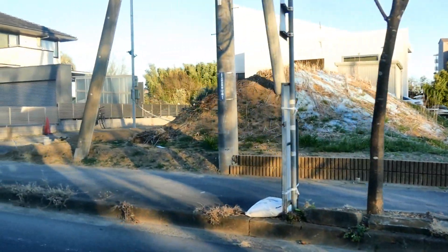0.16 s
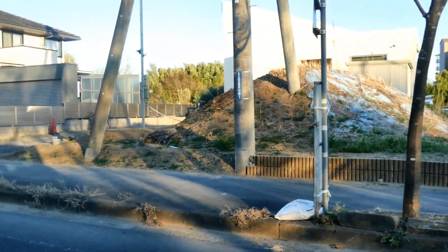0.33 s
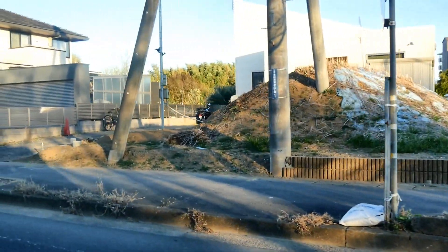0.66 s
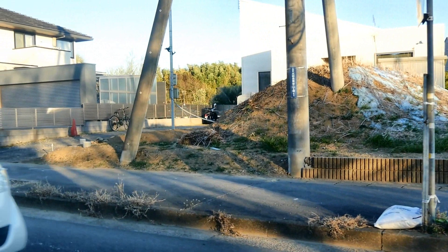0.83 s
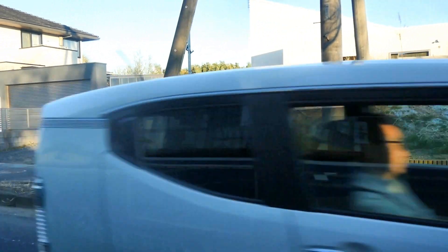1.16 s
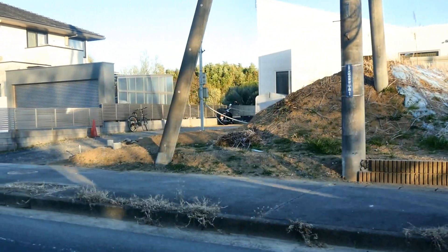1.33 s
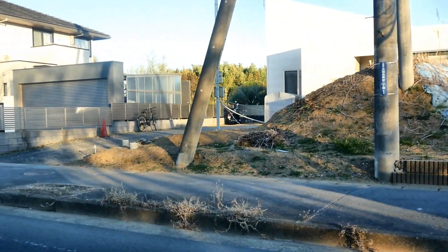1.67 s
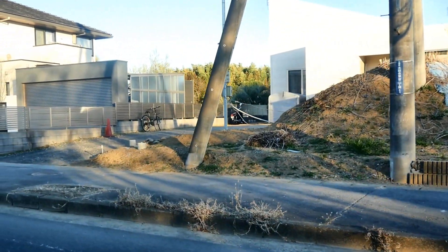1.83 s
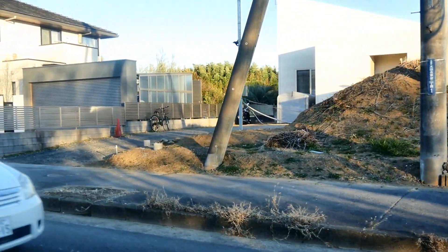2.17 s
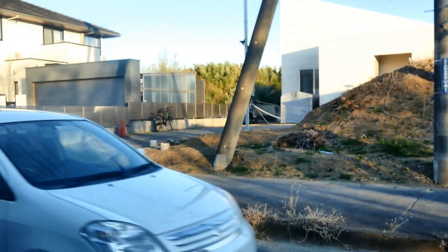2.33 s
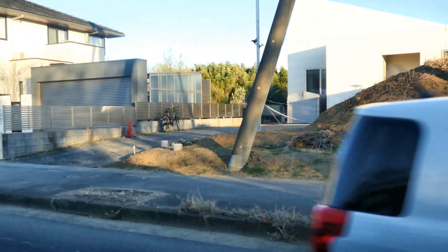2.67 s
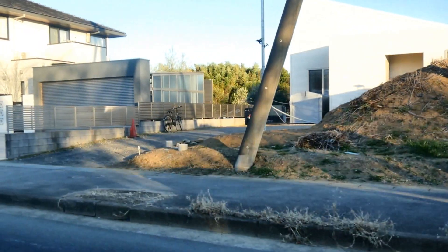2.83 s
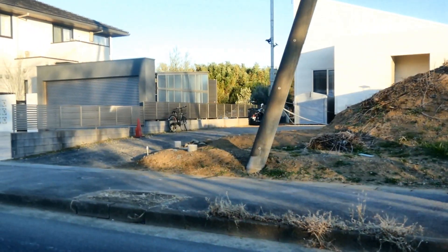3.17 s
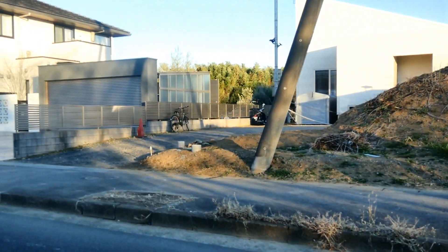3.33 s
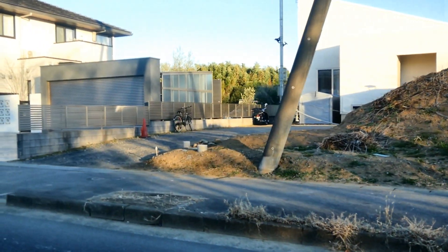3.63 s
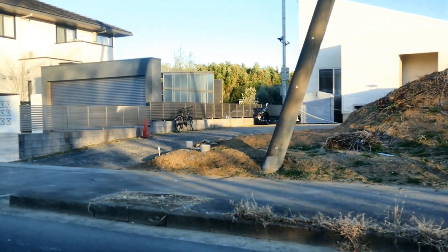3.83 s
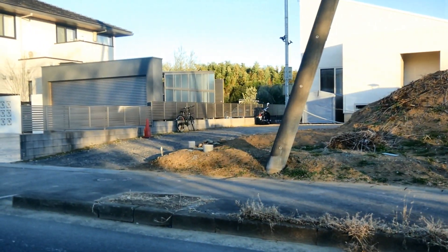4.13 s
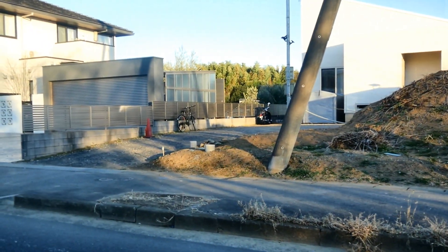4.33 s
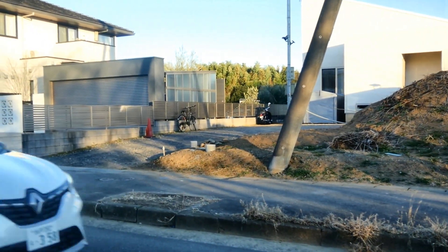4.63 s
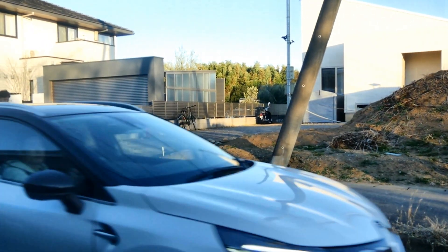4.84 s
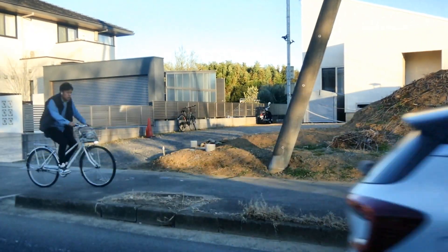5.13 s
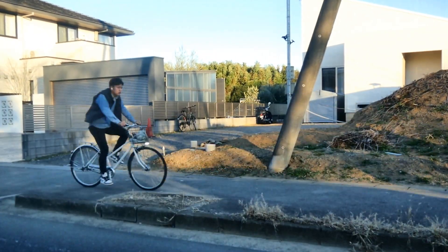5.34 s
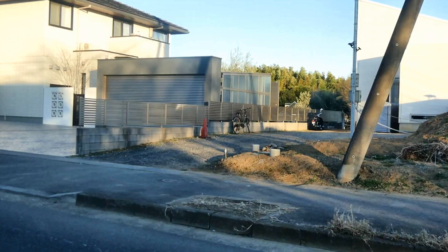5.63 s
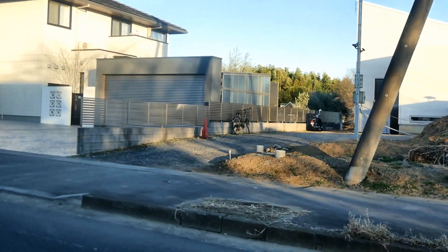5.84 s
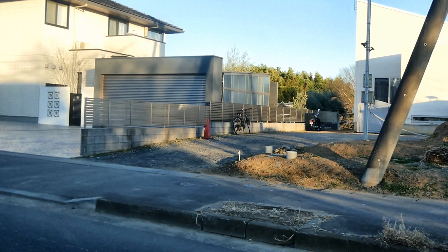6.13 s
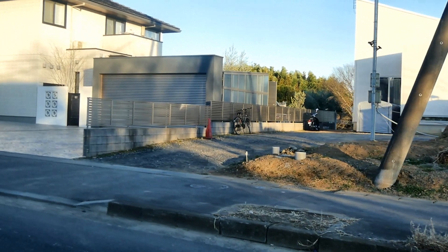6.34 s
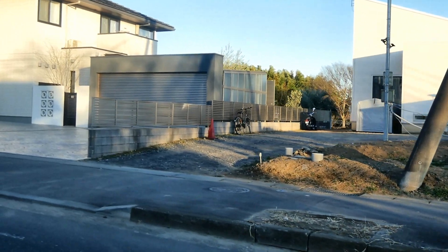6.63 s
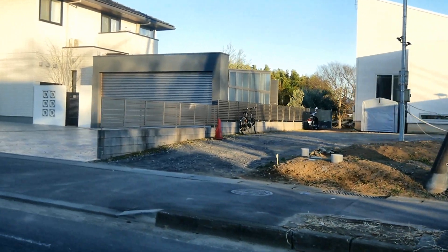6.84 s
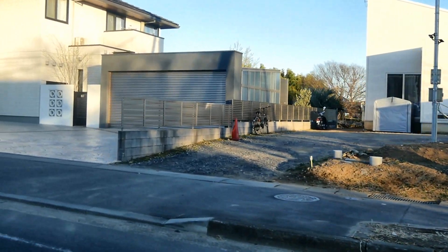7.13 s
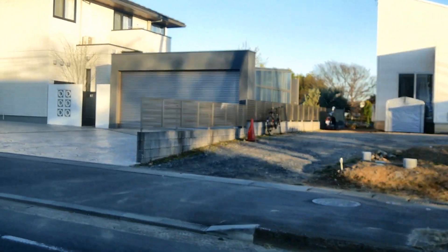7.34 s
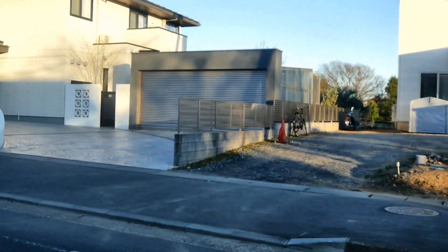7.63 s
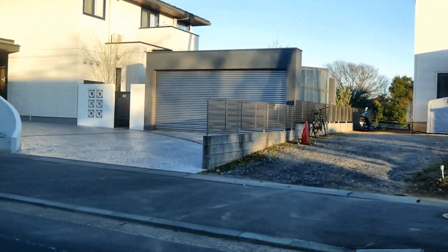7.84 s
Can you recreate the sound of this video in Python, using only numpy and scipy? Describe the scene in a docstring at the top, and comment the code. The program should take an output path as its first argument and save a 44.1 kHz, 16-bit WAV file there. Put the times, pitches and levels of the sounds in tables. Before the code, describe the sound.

Inside a mid-size bus, low road rumble and a steady fan hum lie under close rustles of a nylon jacket. Brakes squeal thinly and groan, oncoming cars swish faintly beyond the glass, and a wheel thumps softly over a bump. After a quarter second of complete silence, the bus pulls away: the body drones and shudders, the diesel climbs, gears whine and a small metal fitting ticks.

```python
"""Inside a mid-size bus. Filtered noise makes the road rumble, passing cars and a rustling nylon jacket; sines make
the fan hum, the groaning brakes and their gliding squeals; struck modes make a wheel bump.
After a short silent break the bus pulls away: the clutch shudders a droning body, the diesel climbs as firing
orders over pulsing noise, drive-line tones flare through cabin resonances and a small metal fitting ticks."""
import sys
import numpy as np
from scipy import signal
from scipy.fft import rfft, irfft, next_fast_len
from scipy.io import wavfile
from scipy.ndimage import uniform_filter1d

SR = 44100
rng = np.random.default_rng(int(sys.argv[2]) if len(sys.argv) > 2 else 0)


def generate_wav(signal):
    """Clip the signal to [-1, 1] and save it as 16-bit WAV at the path in sys.argv[1]."""
    frames = np.transpose(np.atleast_2d(signal))
    scaled = np.clip(frames, -1, 1) * 32767
    pcm = np.round(scaled).astype(np.int16)
    wavfile.write(sys.argv[1], SR, pcm)


N = 352359
T = np.arange(N) / SR   # time [s]

# silent break: (start [s], end [s])
BREAK_S = (5.738, 5.983)
# colour of sliding nylon: (frequency [Hz], relative level per Hz [dB])
NYLON = [(200, -29), (900, -18.5), (2000, -4), (4000, -3.5), (7000, -4), (10300, -1), (12500, -4.5),
         (15000, -13.5)]
# jolts as the clutch takes up: (time [s], relative strength [dB])
SHUDDERS = [(6.098, -21), (6.142, -19), (6.212, -37), (6.394, -13.5), (6.497, -13), (6.55, -21),
            (6.64, -14.5), (6.735, -19), (6.777, -12), (6.821, -18.5), (6.86, -13), (6.909, -12.5),
            (6.934, -15), (6.971, -11.5), (7.04, -24.5), (7.079, -10.5), (7.11, -9.5), (7.18, -15)]
IDLE_HZ, THROTTLE_S = 47.5, 6.65   # firing rate at idle, and when the throttle opens


def from_db(db):
    """Decibels to gain."""
    return 10 ** (np.asarray(db) / 20)


def rms_one(x):
    """Scale to unit power."""
    return x / np.sqrt(np.mean(x ** 2) + 1e-20)


def in_time(rows):
    """Each column of a breakpoint curve at every sample."""
    s, *columns = np.transpose(rows)
    return [np.interp(T, s, column) for column in columns]


def gain_at(points, hz):
    """Gain of a spectrum table, interpolated on a log-frequency axis."""
    at, db = np.transpose(points)
    return from_db(np.interp(np.log(hz + 1), np.log(at), db))


def drift(rate_hz):
    """Random wander of rms 1: noise through a two-pole low-pass, made at every 40th sample."""
    pole = np.exp(-80 * np.pi * rate_hz / SR)
    noise = rng.standard_normal(N // 40 + 2002)
    slow = signal.lfilter([1], [1, -2 * pole, pole * pole], noise)[2000:]   # drop the settling time
    return np.interp(np.arange(N) / 40, np.arange(len(slow)), rms_one(slow))


def held(start, length, attack_s, release_s):
    """Envelope that swells exponentially up to its start, holds at 1, then dies away exponentially."""
    before = (start - T) / attack_s
    after = (T - start - length) / release_s
    return np.exp(-np.maximum(0, np.maximum(before, after)))


def tone(hz):
    """A sine of rms 1 that follows a pitch curve from a random phase."""
    cycles = np.cumsum(hz) / SR + rng.random()
    return np.sqrt(2) * np.sin(2 * np.pi * cycles)


def cabin_noise(spectrum):
    """Coloured stereo noise, mostly alike in the bass and diffuse in the treble; the mid has rms 1."""
    # stereo width: (frequency [Hz], side relative to mid [dB])
    width = [(60, -15), (130, -38.5), (250, -18.5), (400, -17), (700, -5), (1200, -0.5), (2400, -0.5),
             (8000, -1.5), (15000, -3.5)]
    size = next_fast_len(N)
    hz = np.arange(size // 2 + 1) * SR / size
    coloured = rfft(rng.standard_normal((2, size))) * gain_at(spectrum, hz)
    mid = irfft(coloured[0], size)[:N]
    side = irfft(coloured[1] * gain_at(width, hz), size)[:N]
    return np.array([mid + side, mid - side]) / np.std(mid)


def resonate(x, hz, width_hz):
    """Noise through one resonance, at unit power."""
    return rms_one(signal.lfilter(*signal.iirpeak(hz, hz / width_hz, fs=SR), x))


def strike(events, hz, t60):
    """Each (time [s], level [dB]) event sets one mode ringing; it falls 60 dB in t60 seconds."""
    clicks = np.zeros(N) + 1e-18
    for s, db in events:
        clicks[int(s * SR)] = from_db(db)
    pole = from_db(-60 / (t60 * SR))
    angle = 2 * np.pi * hz / SR
    return signal.lfilter([0, np.sin(angle)], [1, -2 * pole * np.cos(angle), pole * pole], clicks)


def echoes(x, count=14, last_s=0.056):
    """Early reflections off windows and seats, different at each ear; their gains keep the power."""
    out = np.zeros((2, N))
    for ear in out:
        delays = rng.uniform(0, last_s, count)
        gains = np.exp(-2 * delays / last_s) * rng.choice([-1, 1], count)
        gains = gains / np.linalg.norm(gains)
        for lag, gain in zip((delays * SR).astype(int), gains):
            ear[lag:] += gain * x[:N - lag]
    return out


def road(level_db=-30, uneven_db=0.8):
    """Tyres rumble through the floor; oncoming cars behind the glass swell and fade with distance."""
    # rolling noise in the cabin: (frequency [Hz], relative level per Hz [dB])
    rolling_colour = [(20, -35.5), (40, -20), (62, -17.5), (85, -4.5), (125, -1), (230, -0.5), (330, -3),
                      (450, -1.5), (505, -7.5), (605, -3), (660, -7), (705, -13), (780, -12.5),
                      (1170, -15.5), (1290, -21.5), (1460, -20), (1650, -22.5), (2300, -27.5), (2800, -25),
                      (3600, -33), (7000, -43.5), (10500, -39.5), (15000, -56)]
    # oncoming cars: (time [s], level [dB], passing time [s])
    cars = [(1.15, -73, 0.16), (2.55, -47.5, 0.34), (4.9, -42, 0.43)]
    # their tyres through the glass: (frequency [Hz], relative level per Hz [dB])
    tyre_colour = [(300, -34), (800, -3.5), (1150, -2), (1700, -16), (2800, -12.5), (5000, -27),
                   (12000, -47.5)]
    rumble = from_db(level_db + uneven_db * drift(11.0)) * cabin_noise(rolling_colour)
    passing = sum(from_db(db) / (1 + ((T - s) / span) ** 2) for s, db, span in cars)
    return rumble + passing * cabin_noise(tyre_colour)


def fan(waver=0.00278, flutter_db=0.5):
    """Steady blade tones of the ventilation fan that waver a little in pitch and level."""
    # blade tones: (frequency [Hz], level [dB])
    blade_tones = [(269.2, -38), (534, -39.5), (2713, -62)]
    hum = 0
    for hz, db in blade_tones:
        level = from_db(db + flutter_db * drift(0.53))
        hum = hum + level * tone(hz * (1 + waver * drift(5.34)))
    return hum


def jacket(grain_db=0.5, catch_db=1.5):
    """Nylon slides in countless tiny slips, heard as noise; each stroke speeds up and slows again."""
    # strokes of the cloth: (start [s], length [s], relative level [dB])
    slides = [(0.0, 0.26, -46), (0.2, 0.49, -43), (0.745, 0.17, -50.5), (1.02, 0.38, -56),
              (1.58, 0.08, -52.5), (1.75, .03, -45), (1.8, 0.11, -47.5), (2.046, 0.023, -53),
              (2.27, 0.86, -54), (2.915, .015, -51), (3.355, 0.089, -44.5), (3.497, 0.031, -41),
              (3.595, 0.043, -41.5), (3.695, 0.079, -46.5), (3.807, 0.019, -44.5), (3.95, .07, -47.5),
              (4.032, 0.01, -40.5), (4.244, 0.22, -51), (4.28, .04, -45), (4.555, 0.048, -44),
              (4.675, .025, -47), (4.81, 0.16, -48), (5.043, 0.046, -48), (5.14, 0.14, -55),
              (5.4, 0.28, -56), (6.292, 0.073, -53), (6.6, 0.26, -55), (7.484, 0.12, -51.5)]
    attack_s, release_s = 0.058, 0.053
    arch_db = -1   # tilt of the level along a stroke; negative is softer in the middle
    motion = from_db(-59)   # the cloth is never quite still
    for s, length, db in slides:
        arch = np.sin(np.pi * np.clip((T - s) / length, 0, 1)) - .75
        stroke = from_db(db + arch_db * arch) * held(s, length, attack_s, release_s)
        motion = np.maximum(motion, stroke)
    texture = from_db(grain_db * drift(250) + catch_db * drift(13))
    return motion * texture * cabin_noise(NYLON) * from_db([[.5], [-.5]])   # a touch to the left


def scuffs(crinkle_db=6.0, rise_s=0.0072, ring_s=0.049, echo_db=-7.5):
    """Firmer, duller scuffs of the cloth crinkle, ring a little and echo round the cabin."""
    # scuffs: (time [s], relative level [dB], decay [s])
    presses = [(0.666, -34, 0.015), (3.505, -39.5, 0.025), (4.834, -44, 0.026), (4.93, -48.5, 0.019)]
    # their colour: (frequency [Hz], relative level per Hz [dB])
    scuff_colour = [(700, -24), (1200, -2), (1450, 3.5), (1700, 3), (2050, -0.5), (2600, -0.5),
                    (3400, -3.5), (4500, -8.5), (14000, -19.5)]
    # what the cloth rubs against: (frequency [Hz], width [Hz], relative level [dB])
    rings = [(2060, 190, -3.5), (3260, 130, -11.5), (3780, 250, -12)]
    press = sum(from_db(db) * held(s, 0, rise_s, decay) for s, db, decay in presses)
    tail = sum(from_db(db) * held(s, 0, rise_s, ring_s) for s, db, _ in presses)
    rub = from_db(crinkle_db * drift(300)) * cabin_noise(scuff_colour)
    ringing = sum(from_db(db) * resonate(rub, hz, width) for hz, width, db in rings)
    scuff = press * rub + tail * ringing
    return (scuff + from_db(echo_db) * echoes(scuff[0])) * from_db([[2.2], [-2.2]])   # to the left


def groan(flutter_db=0.4):
    """The pads groan at a low mode; returns the bare vibration and its envelope."""
    # groans: (start [s], length [s], relative level [dB], level change as the pads bite [dB])
    groans = [(1.64, 0.2, -23.5, 3.5), (1.916, 0.11, -32, -1), (2.092, 0.41, -21, 6),
              (2.56, 0.18, -19.5, 0)]
    groan_hz, attack_s, release_s = 519.6, 0.039, 0.022
    bite_share, bite_width_share = 0.46, 0.17   # place and spread of the bite, as shares of a groan
    ease_off_s, sag_hz_per_s = 2.58, 88   # the pitch sags as the pedal comes up
    hz = groan_hz - sag_hz_per_s * np.clip(T - ease_off_s, 0, 1)
    envelope = 0
    for start, length, db, swell_db in groans:
        bite = np.exp(-.5 * (((T - start) / length - bite_share) / bite_width_share) ** 2)
        swell = from_db(db + swell_db * bite) * held(start, length, attack_s, release_s)
        envelope = np.maximum(envelope, swell)
    return tone(hz * (1 + .00074 * drift(25))), envelope * from_db(flutter_db * drift(15))


def brakes(jitter=.0026, coupling=.25, direct=.85, reflected=.7):
    """The groan also shakes the high squeal into side tones; further disc modes ring along."""
    # two squeals, the second higher, each a curve of (time [s], pitch [Hz], relative level [dB])
    squeals = [
        [(1.07, 9862, -65), (1.076, 9965, -55), (1.2, 9880, -47), (1.304, 9729, -34), (1.38, 9860, -41),
         (1.494, 9958, -43), (1.565, 9864, -34), (1.658, 9977, -39), (1.676, 10062, -51), (1.814, 9983, -40),
         (1.84, 10072, -56)],
        [(1.86, 10210, -51), (2.05, 10120, -47), (2.15, 10290, -49), (2.33, 10130, -52), (2.41, 10007, -43),
         (2.48, 10163, -54), (2.488, 10179, -49), (2.67, 10134, -49), (2.714, 9864, -42), (2.77, 9915, -57)],
    ]
    # disc modes that join in: (start [s], length [s], pitch [Hz], relative level [dB])
    disc_rings = [(1.88, .09, 10595, -50), (2.13, .14, 9130, -54), (2.28, .36, 9165, -60),
                  (2.2, .5, 13950, -71)]
    trim_db, squeal_flutter_db, disc_flutter_db = 1.5, 4.5, 2.4
    edge_s = .012   # rise and fall of the high tones
    shake, envelope = groan()
    depth = coupling * (envelope / envelope.max()) ** .25
    high = 0
    for squeal in squeals:
        hz, db = in_time(squeal)
        start, end = squeal[0][0], squeal[-1][0]
        level = from_db(db + trim_db + squeal_flutter_db * drift(25))
        level = level * held(start, end - start, edge_s, edge_s)
        high = high + level * tone(hz * (1 + jitter * drift(65)))
    high = high * (1 + depth * shake)
    for start, length, hz, db in disc_rings:
        level = from_db(db + disc_flutter_db * drift(8)) * held(start, length, edge_s, edge_s)
        high = high + level * tone(hz * (1 + jitter * drift(20.5)))
    low = envelope * shake * from_db([[-.2], [.2]])
    # the gliding squeal beats against its own reflections and flutters differently at each ear
    return low + direct * high + reflected * echoes(high)


def bumps(low_hz=90, soft_hz=560):
    """A jolt, softened by the tyres, shakes the body panels, which radiate little deep bass."""
    # wheels over a bump: (time [s], relative strength [dB])
    jolts = [(3.044, -24), (3.0515, -16.5), (3.0665, -19), (3.084, -27.5)]
    # body panel modes: (frequency [Hz], relative level [dB], t60 [s])
    panels = [(100, -11, 0.05), (151, 1, 0.048), (190, 13.5, 0.024), (273, -8, 0.23), (320, 1.5, 0.033),
              (457, 3, 0.032)]
    thump = 0
    for k, (hz, db, t60) in enumerate(panels):
        thump = thump + from_db(db) * strike(jolts, hz, t60) * (-1) ** k   # alternate polarity
    return signal.sosfilt(signal.butter(2, [low_hz, soft_hz], "band", fs=SR, output="sos"), thump)


def zips(edge_s=0.015, width_hz=330):
    """The ribs of the weave rub at a fairly even rate and give a short pitched hiss."""
    # quick slides: (start [s], length [s], pitch [Hz], level [dB])
    hisses = [(3.87, .06, 13150, -58), (4.32, .07, 13250, -55), (4.43, .16, 13700, -60),
              (5.43, .025, 10500, -45), (6.28, .03, 9450, -50)]
    rub = cabin_noise(NYLON)
    out = 0
    for s, length, hz, db in hisses:
        out = out + from_db(db) * held(s, length, edge_s, edge_s) * resonate(rub, hz, width_hz)
    return out


def shudders(attack_s=0.0049, release_s=0.012):
    """Strength of the uneven jolts from the clutch, each a quick rise and decay."""
    return sum(from_db(db) * held(s, 0, attack_s, release_s) for s, db in SHUDDERS)


def body_drone(shudder, waver=0.0048):
    """Panels drone and throb at low revs, leap and waver in pitch with each shudder, sink slowly in pitch and
    fade on moving off."""
    # drones: (pitch [Hz], relative level [dB], fade [dB/s], share of each shudder [0-1])
    drones = [(124.5, -30, 14, 0.17), (236.4, -19, 18.5, 0.81)]
    shudder_db = 0.5   # how strongly a shudder shakes the drone
    sag_per_s = 0.0356   # share by which the pitch falls as the load comes on
    pulse_hz, pulse_depth, pulse_grows_s = 16.3, 0.59, 0.19   # the throb deepens as the clutch bites
    since_s = np.maximum(T - BREAK_S[1], 0)
    unsteady = waver + .06 * shudder / shudder.max()
    depth = pulse_depth * np.minimum(since_s / pulse_grows_s, 1)
    pulse = 1 + depth * np.cos(2 * np.pi * pulse_hz * (T - SHUDDERS[0][0]))
    out = 0
    for hz, db, fade, share in drones:
        level = pulse * from_db(db - fade * since_s) + share * from_db(shudder_db) * shudder
        out = out + level * tone(hz * (1 - sag_per_s * since_s + unsteady * drift(16.0)))
    return out


def firing_rate(unsteady=0.0028, climb_hz_per_s=29, eases_s=2.3):
    """Firings per second: idle, then a climb from the open throttle that eases off."""
    climb = 1 - np.exp(-np.maximum(T - THROTTLE_S, 0) / eases_s)
    return (IDLE_HZ + climb_hz_per_s * eases_s * climb) * (1 + unsteady * drift(28))


def engine(firing_hz, shudder, throb_db=4.0):
    """Orders and clatter grow with revs, boom and growl with load and shudders; firings pulse the noise."""
    # engine orders and a belt-driven pump: (multiple of the firing rate, relative level [dB])
    order_levels = [(1, -0.5), (1.5, -3.5), (2, 3.5), (2.37, -2.5), (2.57, -5), (3, -7), (4, -6),
                    (6.18, -9)]
    # rumble under load: (time [s], relative boom level [dB], relative growl level [dB])
    load = [(6.02, -31, -31), (6.066, -29, -32), (6.154, -24.5, -30), (6.236, -25, -30), (6.278, -31, -33),
            (6.48, -28, -31), (6.568, -22, -28), (6.72, -23, -25.5), (6.88, -25.5, -27),
            (7.132, -25, -26.5), (7.88, -23.5, -24.5)]
    # colours of the three noises: (frequency [Hz], relative level per Hz [dB])
    boom_colour = [(20, -58), (50, -38), (75, -6), (105, 1.5), (130, 6), (165, 9.5), (200, 8.5), (240, 5),
                   (290, 4.5), (350, -13), (700, -49), (2000, -92)]
    growl_colour = [(40, -46), (150, -15), (260, 6), (330, 4), (430, 2.5), (560, -4.5), (640, -8),
                    (760, -14.5), (1500, -28.5), (5000, -81)]
    clatter_colour = [(40, -24), (300, -5.5), (650, 6), (1000, 1), (1400, -3), (2200, -9), (2800, -9),
                      (3600, -18), (7000, -26), (10500, -26.5), (13000, -34), (15000, -45)]
    orders_idle_db, orders_db_per_octave = -47, 30.5
    clatter_idle_db, clatter_db_per_octave = -40, 3.5
    boom_trim_db, boom_db_per_octave, growl_trim_db = 1, 5, 2.5
    shudder_boom_db, shudder_growl_db = -9.5, -11.5   # how strongly a shudder shakes each layer
    octaves = np.log2(firing_hz / IDLE_HZ)

    orders = sum(from_db(db + 1.5 * drift(7)) * tone(k * firing_hz) for k, db in order_levels)
    orders = from_db(orders_idle_db + orders_db_per_octave * octaves) * orders

    boom_db, growl_db = in_time(load)
    boom_db = boom_db + boom_trim_db + boom_db_per_octave * octaves + throb_db * drift(2.7)
    boom_level = np.hypot(from_db(boom_db), from_db(shudder_boom_db) * shudder)   # powers add
    growl_level = np.hypot(from_db(growl_db + growl_trim_db), from_db(shudder_growl_db) * shudder)
    clatter_level = from_db(clatter_idle_db + clatter_db_per_octave * octaves)
    boom = boom_level * cabin_noise(boom_colour)
    growl = growl_level * cabin_noise(growl_colour)
    clatter = clatter_level * cabin_noise(clatter_colour)
    pulse = rms_one(1 + .18 * tone(firing_hz))
    return orders + (boom + growl + clatter) * pulse


def drive_whine(firing_hz, throb_db=1.6, jitter=.007, ear_db=.8):
    """Shaft and gear tones rise roughly with the engine; cabin resonances they cross flare and ring on."""
    # shaft, gear meshes and overtones: (multiple of the firing rate, relative level [dB])
    drive_orders = [(3.79, 0), (7.28, -7), (8.56, 0), (17.05, 0), (19.5, -4), (25.3, -4)]
    # cabin resonances: (frequency [Hz], width of each of two passes [Hz], relative level [dB])
    resonances = [(214, 14, -20), (232, 19, -13), (265.3, 36, -13.5), (522, 48, -20.5), (572, 22, -27),
                  (865, 30, -47), (985, 76, -36), (1125, 40, -44), (1255, 56, -43), (1400, 56, -45)]
    coast_db, load_s = -4, 0.23   # the gears are quieter until the throttle loads them
    drive = 0
    for order, order_db in drive_orders:
        balance_db = ear_db * drift(12) * np.array([[1], [-1]])   # wanders between the ears
        level_db = order_db + throb_db * drift(30) + balance_db
        drive = drive + from_db(level_db) * tone(order * firing_hz * (1 + jitter * drift(49.3)))
    drive = drive * from_db(coast_db * np.clip((THROTTLE_S - T) / load_s + 1, 0, 1))
    out = 0
    for hz, width, db in resonances:
        peak = signal.iirpeak(hz, hz / width, fs=SR)
        out = out + from_db(db) * signal.lfilter(*peak, signal.lfilter(*peak, drive))
    return out


def fitting(per_s=6, chatter_db=-63):
    """A small metal part chatters faintly at random and now and then ticks, with two close modes."""
    # louder ticks: (time [s], relative level [dB])
    ticks = [(6.181, -57), (6.521, -56), (6.671, -57), (6.751, -53), (7.012, -44), (7.184, -52),
             (7.245, -55), (7.447, -56), (7.725, -43), (7.776, -45), (7.819, -54)]
    chance = rng.random((int(per_s * N / SR), 2))
    chatter = [(u * (N - 1) / SR, chatter_db + 8 * v) for u, v in chance]
    touches = chatter + ticks
    ringing = strike(touches, 5090, 0.042) + strike(touches, 5020, 0.028)
    return 0.81 * ringing + 0.58 * echoes(ringing)


def scene():
    """Rolling and braking, a silent break, then pulling away; fan and cloth are heard on both sides."""
    rolling = (road() + brakes()) * (T < BREAK_S[0])
    firing_hz, shudder = firing_rate(), shudders()
    fade_in = np.clip((T - BREAK_S[1]) / 0.0095, 0, 1) ** .5   # the sound returns within 9.5 ms
    pulling = body_drone(shudder) + engine(firing_hz, shudder) + drive_whine(firing_hz) + fitting()
    outside_break = (T < BREAK_S[0] - .001) | (T > BREAK_S[1] + .001)
    heard = uniform_filter1d(1. * outside_break, size=88)   # 2 ms edges
    cloth = jacket() + scuffs() + zips()
    return (rolling + pulling * fade_in + bumps() + fan() + cloth) * heard


def record(dry):
    """The microphone has a narrow notch in the treble; a steep low-pass cuts the top."""
    notched = signal.lfilter(*signal.iirnotch(7860, 28, fs=SR), dry)
    cutoff_hz = 15400
    return signal.sosfilt(signal.ellip(10, .1, 90, cutoff_hz, fs=SR, output="sos"), notched)


dry = scene()
out = record(dry)
generate_wav(out)
```